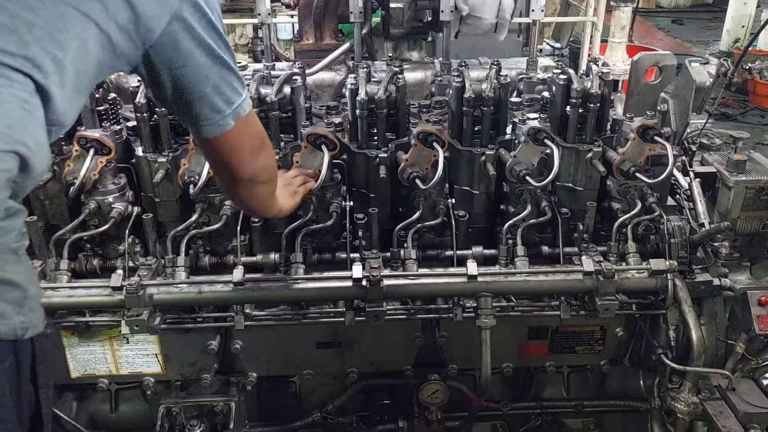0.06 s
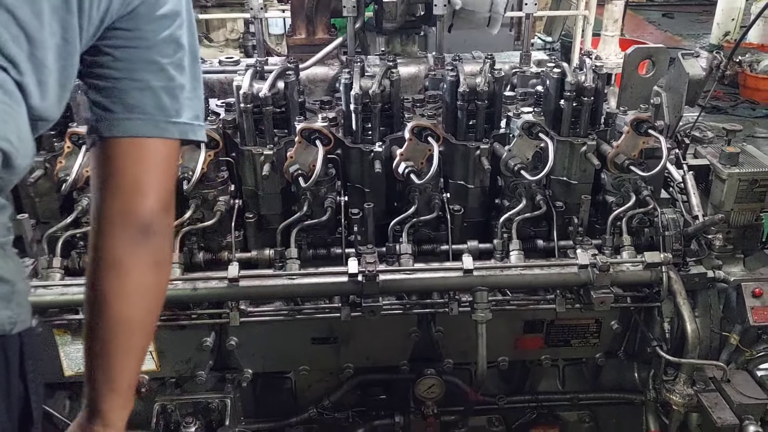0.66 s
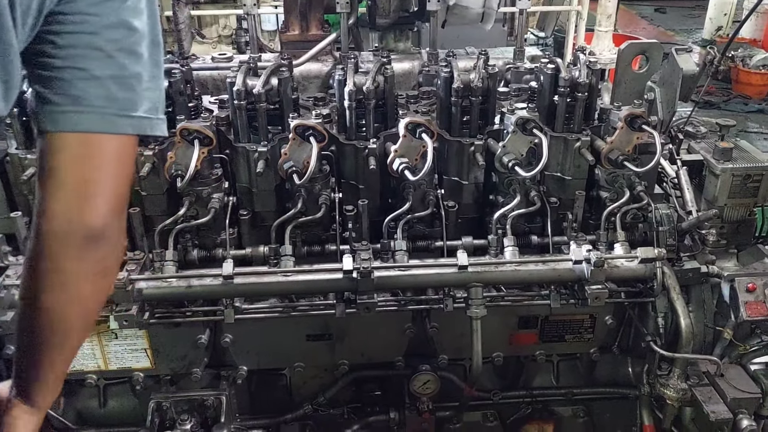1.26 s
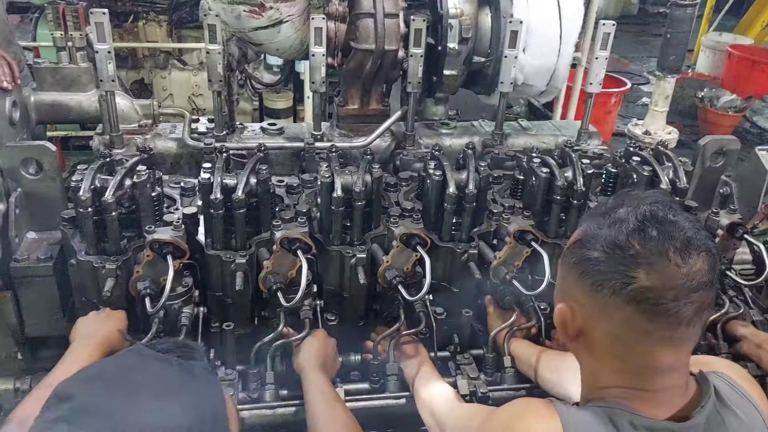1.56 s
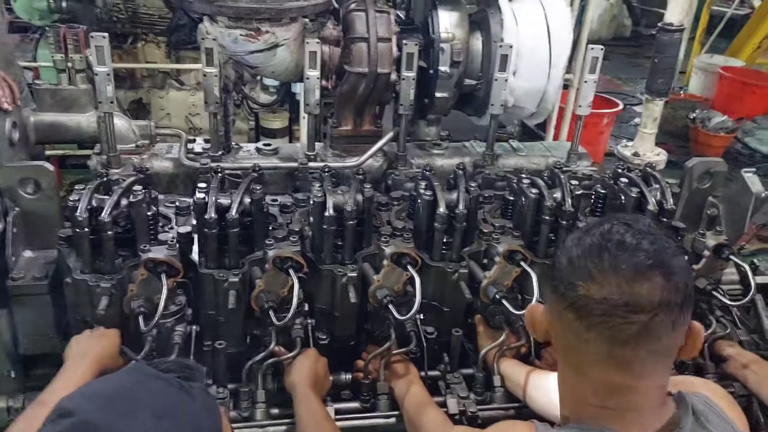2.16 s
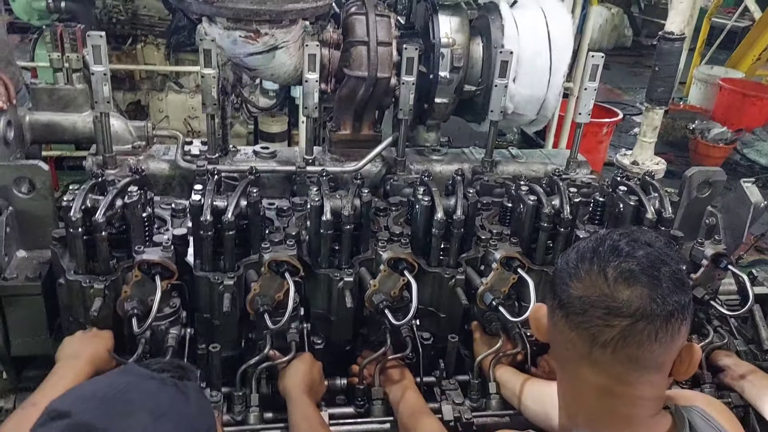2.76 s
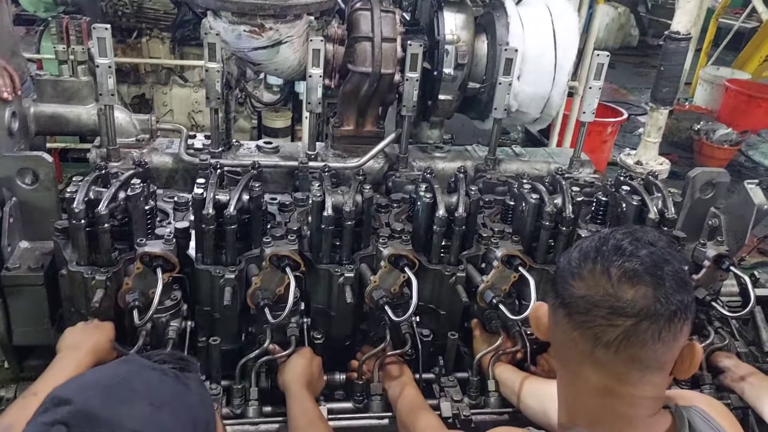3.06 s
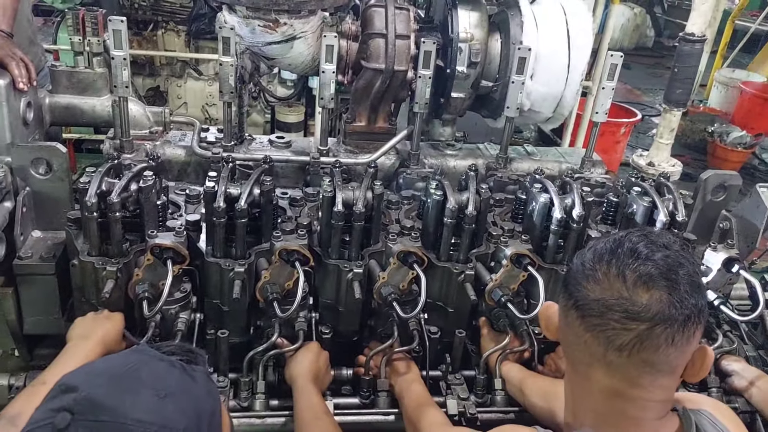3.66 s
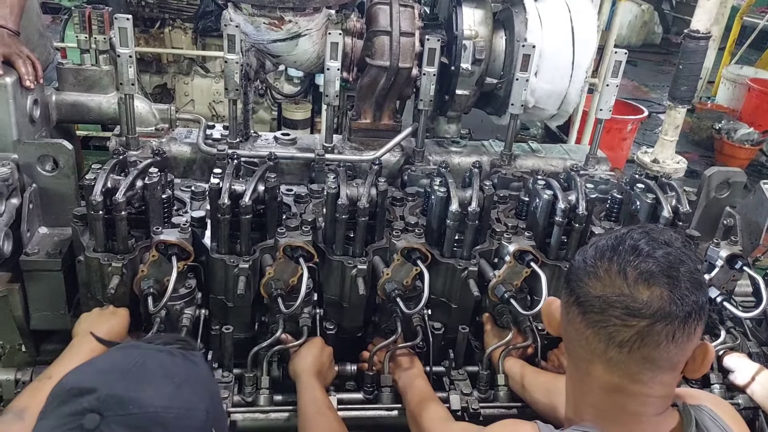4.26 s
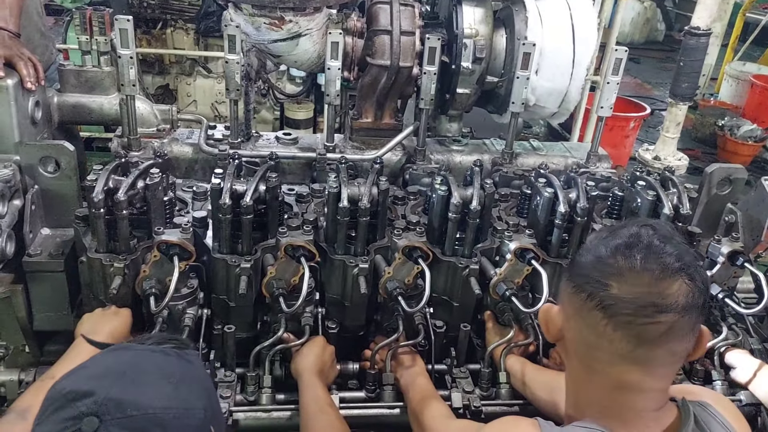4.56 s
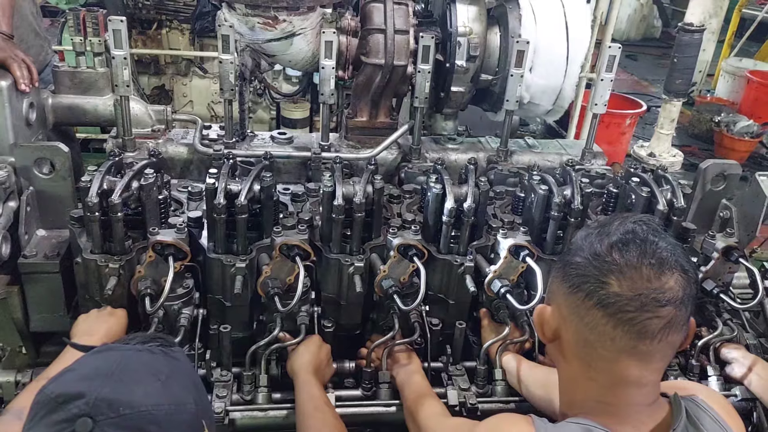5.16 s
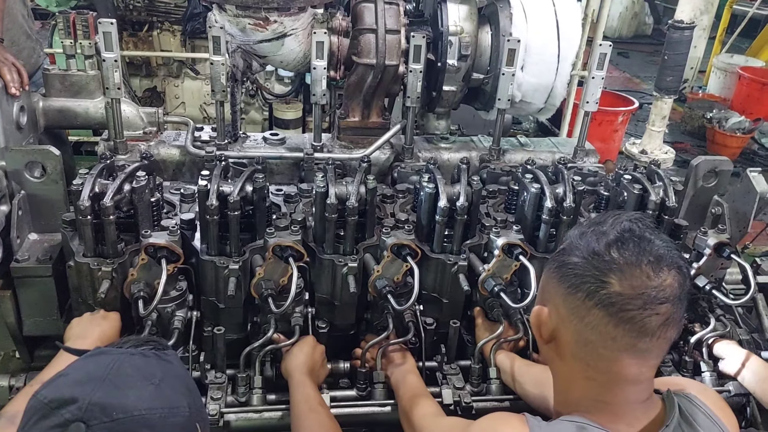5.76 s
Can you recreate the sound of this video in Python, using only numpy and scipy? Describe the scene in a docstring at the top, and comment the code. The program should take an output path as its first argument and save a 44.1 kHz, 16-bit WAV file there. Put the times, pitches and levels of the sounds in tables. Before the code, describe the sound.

In a ship's steel engine room, gears coast down with a falling whine and rattle, then cut to a brief silence. A low hum returns with a heavy, dull clunk and a few distant knocks. Compressed air suddenly bursts in with a hiss and boom, and a large diesel engine turns over nearby, quickly gathering speed into a loud, steady rhythm of thumps, valve clatter and whistling gears.

```python
"""A steel engine room with a marine diesel. Gears coast down with a falling whine; after a short
silence the room hums and something heavy clunks. Starting air bursts in and the engine turns over,
quickening to seven working cycles a second: in each one the valve gear clatters, the block thumps
and the gears whistle as the crank surges."""
import sys
import numpy as np
from scipy import signal
from scipy.fft import rfft, irfft
from scipy.io import wavfile
from scipy.ndimage import uniform_filter1d

SR = 44100
rng = np.random.default_rng(int(sys.argv[2]) if len(sys.argv) > 2 else 0)


def to_wav(s):
    """Save 16-bit WAV."""
    ch = np.atleast_2d(s).T  # columns
    pcm = np.round(np.clip(ch, -1, 1) * 32767)  # PCM
    wavfile.write(sys.argv[1], SR, pcm.astype(np.int16))


N = 261072
TIME, FREQS = np.arange(N) / SR, np.maximum(np.fft.rfftfreq(N, 1 / SR), 1)
SILENCE_FROM_S, SILENCE_TO_S = .787, .95


def from_db(db):
    """Decibels to gain."""
    return 10 ** (np.asarray(db) / 20)


def unit_power(x):
    """Scale to an RMS of 1."""
    return x / np.sqrt(np.mean(x ** 2) + 1e-20)


def eq_curve(points):
    """Join (Hz, dB) points along a log-frequency axis."""
    hz, db = np.transpose(points)
    return np.interp(np.log(FREQS), np.log(hz), db)


def drift(rate_hz):
    """A random wobble of spread 1, mostly slower than the given rate."""
    return unit_power(irfft(rfft(rng.standard_normal(N)) / (1 + (FREQS / rate_hz) ** 2), N))


def envelope(start_s, attack_s, hold_s, fall_db_per_s):
    """A straight attack, a hold and an exponential release."""
    since = TIME - start_s
    release = from_db(-fall_db_per_s * np.maximum(since - attack_s - hold_s, 0))
    return np.clip(since / attack_s, 0, 1) * release


def swell(peak_s, half_s):
    """A single bell-shaped swell of height 1."""
    return np.exp(-((TIME - peak_s) / half_s) ** 2)


def cycle_offset(phase, peak):
    """Signed distance from the nearest peak, in cycles."""
    return (phase - peak + .5) % 1 - .5


def bump(phase, peak, half):
    """A swell of height 1 that returns at the same point of every cycle."""
    return np.exp(-(cycle_offset(phase, peak) / half) ** 2)


def tone(hz, flutter, rough_db):
    """A gliding tone of unit power that wavers in pitch and strength."""
    angle = 2 * np.pi * np.cumsum(hz * (1 + flutter * drift(58.4))) / SR
    return unit_power(np.sin(angle) * from_db(rough_db * drift(54)))


def ring(clicks, hz, t60):
    """A unit click sets a decaying sine of height 1 ringing."""
    r, w = from_db(-60 / (t60 * SR)), 2 * np.pi * hz / SR
    return signal.lfilter([0, np.sin(w)], [1, -2 * r * np.cos(w), r * r], clicks + 1e-18)


def reflect(x, t60, wet_db):
    """Steel walls add a dense tail, different at each ear; the power is kept."""
    tail = rng.standard_normal((2, SR // 2)) * from_db(-60 * TIME[:SR // 2] / t60)
    tail /= np.sqrt(np.sum(tail ** 2, axis=1, keepdims=True))
    wet = from_db(wet_db) * signal.fftconvolve(x[None], tail, axes=1)[:, :N]
    return unit_power(x + wet) * np.std(x)


def standing_waves(depth_db=4, spacing_hz=24.36):
    """Reflections between steel surfaces leave narrow peaks and dips above 500 Hz: two curves in dB."""
    grid = np.arange(0, SR / 2, spacing_hz)
    ripple = np.array([np.interp(FREQS, grid, row) for row in rng.standard_normal((len(grid), 2)).T])
    return depth_db * ripple * np.clip(FREQS / 1000 - .5, 0, 1)


# Stereo width, narrow in the bass. Each row: frequency in Hz, side minus mid in dB.
STEREO_WIDTH = [(60, -14.5), (150, -20.5), (300, -10), (550, -6), (1100, 1), (15000, -.5)]

def colour(pair, spectrum):
    """Two unrelated signals become mid and side of one sound with this spectrum and steep skirts."""
    outside = np.maximum(spectrum[0][0] / FREQS, 1) * np.maximum(FREQS / spectrum[-1][0], 1)
    mid, side = rfft(pair) * from_db(eq_curve(spectrum) + standing_waves()) / outside ** 8
    mid, side = irfft(mid, N), irfft(side * from_db(eq_curve(STEREO_WIDTH)), N)
    return np.array([mid + side, mid - side]) / np.std(mid)


def noise(spectrum):
    """Steady stereo noise, shaped by (Hz, dB) points."""
    return colour(rng.standard_normal((2, N)), spectrum)


def bearing(start_hz=1405, sag_hz_per_s=520):
    """A bearing sings briefly, sagging as the gears slow."""
    singing = tone(np.maximum(start_hz - sag_hz_per_s * TIME, 100), flutter=.007, rough_db=2.5)
    return from_db(-39) * envelope(0, attack_s=.017, hold_s=.057, fall_db_per_s=91) * singing


# The gears' slowdown. Each row: time in seconds, tooth rate in Hz.
COAST_TOOTH_RATE = [(0, 1410), (.08, 1345), (.19, 1165), (.25, 1092), (.345, 960), (.43, 863), (.565, 688),
                    (.79, 472)]
# Their whine. Each row: multiple of the tooth rate, level in dB before fading.
WHINE_HARMONICS = [(1, -47.5), (2, -54), (3, -61)]
# Loaded teeth. Each row: peak and half length in seconds, multiple of the tooth rate, level in dB.
TOOTH_SQUEAKS = [(0.031, 0.014, 1, -38), (0.15, 0.021, 1, -51), (0.188, 0.025, 2, -44),
                 (0.247, 0.016, 2, -39.5), (0.297, .015, 2, -42), (0.347, .018, 2, -46),
                 (0.428, 0.011, 2, -44), (0.472, 0.014, 2, -49), (0.559, 0.025, 3, -45.5),
                 (0.569, 0.0092, 2, -42.5), (0.618, 0.011, 1, -50.5)]
# The gears' rattle. Each row: frequency in Hz, relative level in dB.
RATTLE_SPECTRUM = [(260, -34), (450, -0.5), (477, -13), (802, -4.5), (1030, -5), (1350, -2), (1520, -5),
                   (2100, -0.5), (2800, -8.5), (3530, -13.5), (5100, -11), (5750, -14.5), (7070, -13.5),
                   (8320, -28), (13000, -29.5), (15500, -50)]

def coasting_gears(fade_from_s=.49, housing_hz=1300):
    """Free-running gears whine, squeak and rattle as they slow; their housing radiates lows poorly."""
    fading_s = np.maximum(TIME - fade_from_s, 0)
    tooth_hz = np.interp(TIME, *np.transpose(COAST_TOOTH_RATE))
    angle = 2 * np.pi * np.cumsum(tooth_hz * (1 + .0075 * drift(125))) / SR
    whine = 0
    for k, db in WHINE_HARMONICS:
        level = from_db(db - 3.9 * TIME - 20 * fading_s + 3.3 * drift(50))
        radiated = np.minimum(k * tooth_hz / housing_hz, 1) ** 2
        whine += level * radiated * np.sin(k * angle)
    for peak_s, half_s, k, db in TOOTH_SQUEAKS:
        whine += from_db(db) * swell(peak_s, half_s) * np.sqrt(2) * np.sin(k * angle)
    rattle = from_db(-42.5 - 26 * fading_s + 1.1 * drift(90)) * noise(RATTLE_SPECTRUM)
    return rattle + reflect(whine + bearing(), t60=.2, wet_db=-7)


# A thin, breathy hiss. Each row: frequency in Hz, relative level in dB.
SIGH_SPECTRUM = [(2800, 1), (4200, -4), (5200, 2.5), (5900, -3), (7000, -1), (8300, -14), (13000, -13),
                 (15000, -18)]

def sigh():
    """Spent air sighs out while the gears coast."""
    return from_db(-47) * swell(peak_s=.27, half_s=.19) * noise(SIGH_SPECTRUM)


# The low and high beds of room tone. Each row: frequency in Hz, relative level in dB.
RUMBLE_SPECTRUM = [(36, -25), (62, -0.5), (113, -14.5), (178, -5.5), (220, -13.5), (244, -8.5),
                   (308, -10.5), (365, -19.5), (433, -23), (480, -33), (620, -56), (1060, -120)]
HISS_SPECTRUM = [(260, -44), (450, -10), (851, -10.5), (1080, -9.5), (1450, -7.5), (1680, -9), (2200, -3.5),
                 (2470, -9), (2650, -7), (3100, -14), (4400, -11), (5050, -4), (5700, -10.5), (7000, -13),
                 (7500, -22), (15500, -22)]
# Whistling ducts. Each row: centre in Hz, width in Hz, level in dB.
DUCT_RESONANCES = [(974, 71, -65), (2290, 90, -63), (3760, 60, -69), (5180, 220, -65)]

def room_tone():
    """A rumble and hiss die away with the coasting gears; after the silence, steady room tone
    fades in with whistling ducts."""
    fading = from_db(-43.5 - 5 * TIME) * noise(RUMBLE_SPECTRUM)
    fading += from_db(-43.5 - 32 * TIME) * noise(HISS_SPECTRUM)
    steady = from_db(-48) * noise(RUMBLE_SPECTRUM) + from_db(-55) * noise(HISS_SPECTRUM)
    for hz, width_hz, db in DUCT_RESONANCES:
        resonance = 1 / (1 + (2 * (FREQS - hz) / width_hz) ** 2)
        steady += from_db(db) * unit_power(irfft(rfft(rng.standard_normal((2, N))) * resonance, N))
    fade_in = np.clip((TIME - SILENCE_TO_S) / .11 + .13, 0, 1)
    return (TIME < SILENCE_FROM_S) * fading + fade_in * steady


# Distant knocks. Each row: start in seconds, level in dB.
PLATE_BLOWS = [(0.499, -45.5), (0.564, -42), (1.08, -59), (1.245, -39.5), (1.634, -46), (2.05, -48)]
# The plate's boom. Each row: pitch in Hz, gain in dB, seconds to fall 60 dB.
PLATE_MODES = [(174, -8, 0.97), (247.7, 1.5, 0.41), (272, -8, 0.31)]

def deck_plate():
    """Soft far blows ring a deck plate, blurred by the room."""
    clicks = np.zeros(N)
    for start_s, db in PLATE_BLOWS:
        clicks[int(start_s * SR)] = from_db(db)
    ringing = sum(ring(clicks * from_db(db), hz, t60) for hz, db, t60 in PLATE_MODES)
    return reflect(ringing, t60=.31, wet_db=-18)


# The clunk's dull body. Each row: frequency in Hz, relative level in dB.
CLUNK_SPECTRUM = [(59, -40), (100, -14), (133, -2), (203, -30), (243, -6), (310, 0), (350, -5.5),
                  (2010, -27.5), (2600, -34), (3380, -64), (5720, -120)]

def clunk(slide_s=.926, hit_s=1.061):
    """Something heavy slides, then clunks home with a short, brighter contact."""
    slide = from_db(-48.5) * envelope(slide_s, attack_s=.046, hold_s=.088, fall_db_per_s=92)
    blow = from_db(-41) * envelope(hit_s, attack_s=.0075, hold_s=.072, fall_db_per_s=77)
    contact = from_db(-41.5) * envelope(hit_s, attack_s=.001, hold_s=.02, fall_db_per_s=220)
    body = (slide + blow) * from_db(1.3 * drift(56)) * noise(CLUNK_SPECTRUM)
    return body + contact * noise([(500, 2), (1600, -15)])


def generator_hum(start_s=1.1, hz=49.7):
    """A generator's low hum fades in and stays."""
    level = np.clip((TIME - start_s) / .13, 0, 1) * from_db(-45 + .54 * drift(6))
    return level * np.sqrt(2) * np.sin(2 * np.pi * hz * TIME)


def lever(start_s=2.095):
    """The starting lever gives a faint squeak just before the air comes."""
    squeak = tone(hz=1000, flutter=.04, rough_db=3)
    return from_db(-56) * envelope(start_s, attack_s=.009, hold_s=.012, fall_db_per_s=400) * squeak


# Bright jet, roaring pipes and deep boom. Each row: frequency in Hz, relative level in dB.
JET_SPECTRUM = [(590, -48), (1000, -15), (1170, -17), (1370, -1), (1600, -9.5), (1870, 7), (2080, 4),
                (2500, -12.5), (3910, -10.5), (5230, -2.5), (5700, -5.5), (6220, -4.5), (6950, -5),
                (8440, -17.5), (12600, -8.5), (15500, -23)]
ROAR_SPECTRUM = [(120, -40), (200, -2.5), (301, -5), (342, -10.5), (591, -8), (720, -3), (879, -8),
                 (1040, -24), (1350, -14.5), (1600, -22), (1900, -13.5), (2600, -19), (3380, -24.5),
                 (5720, -120)]
BOOM_SPECTRUM = [(29, -41), (50, -30), (70, -1), (100, -7), (132, 1.5), (165, -6.5), (215, -2), (284, -11),
                 (332, -4), (450, -11.5), (580, -37), (990, -120)]
# Filling cylinders. Each row: start, attack and hold in seconds, fall in dB per second, level in dB.
CYLINDER_BOOMS = [(2.192, 0.018, 0.12, 118, -26), (2.23, .018, 0.031, 300, -16),
                  (2.332, 0.011, 0.065, 113, -24), (2.555, .015, .03, 150, -29.5)]

def starting_air(opens_s=2.161, shuts_s=2.7):
    """The valve cracks open, pipes roar and cylinders boom; air flows on weakly until it shuts."""
    flow = envelope(opens_s, attack_s=.013, hold_s=shuts_s - opens_s - .06, fall_db_per_s=159)
    crack = from_db(-21.5) * envelope(opens_s, attack_s=.00063, hold_s=.0026, fall_db_per_s=750)
    burst = from_db(-25.5) * envelope(opens_s, attack_s=.0012, hold_s=.07, fall_db_per_s=260)
    puff = from_db(-47) * envelope(2.42, attack_s=.12, hold_s=.01, fall_db_per_s=170)
    rush = from_db(-14.5) * envelope(2.165, attack_s=.059, hold_s=.0056, fall_db_per_s=192)
    filling = sum(from_db(db) * envelope(*shape) for *shape, db in CYLINDER_BOOMS)
    jet = (crack + burst + puff + from_db(-44) * flow) * from_db(.96 * drift(120)) * noise(JET_SPECTRUM)
    roar = (rush + from_db(-33) * flow) * from_db(.94 * drift(70)) * noise(ROAR_SPECTRUM)
    return jet + roar + filling * noise(BOOM_SPECTRUM)


def crank(start_s, first_speed=.321, run_up_s=.41, full_cycles_per_s=7.16):
    """The run-up: share of full speed, cycles done, and the present cycle's age in samples."""
    speed = 1 - (1 - first_speed) * np.exp(-np.maximum(TIME - start_s, 0) / run_up_s)
    cycles = np.cumsum(speed * (TIME > start_s)) * full_cycles_per_s / SR
    began = np.searchsorted(cycles, np.floor(cycles), side="right")
    return speed, cycles, np.maximum(np.arange(N) - began, 0)


def contacts(age, spectrum, alike, grain_db):
    """Dense contacts of uneven size: the share `alike` falls the same way in every cycle."""
    same, fresh = (rng.standard_normal((2, N)) * from_db(grain_db * drift(226)) for _ in range(2))
    return colour(np.sqrt(alike) * same[:, age] + np.sqrt(1 - alike) * fresh, spectrum)


# The weight of the block. Each row: frequency in Hz, relative level in dB.
THUMP_SPECTRUM = [(21, -46), (35, -36), (70, 2.5), (102, -5), (135, 3.5), (163, -5), (215, -4), (276, -7.5),
                  (318, -2), (354, -5.5), (380, -10.5), (490, -6.5), (840, -120)]

def block_thump(cycles, age, slow):
    """The block thumps early in each cycle and dips near its end, more deeply at low speed."""
    push_db = 1.8 * bump(cycles, peak=.21, half=.61)
    dip_db = (1.5 + 26 * slow * (cycles > .6)) * bump(cycles, peak=.89, half=.13)
    level = from_db(-25.5 - 14 * slow + push_db - dip_db)
    return level * contacts(age, THUMP_SPECTRUM, alike=.42, grain_db=1)


# Bass notes of one cycle. Each row: peak and half length in cycles, pitch in Hz,
# glide in octaves per cycle, relative level in dB.
PRESSURE_THROBS = [(.005, .08, 78, 1, -0.5), (.08, .06, 134.5, 2, -1), (.145, 0.05, 214.1, 0, 2),
                   (.24, .085, 135.1, -1, -1), (.4, .07, 105, -2, -3.5), (.84, .06, 77.9, 0, -1.5)]

def block_throbs(phase, slow):
    """Pressure swings in the block: a deep push, a swoop upward as the cylinder fires, and a sag."""
    out = 0
    for peak, half, hz, glide, db in PRESSURE_THROBS:
        note = tone(hz * 2 ** (glide * cycle_offset(phase, peak)), flutter=.04095, rough_db=0)
        out += from_db(db) * bump(phase, peak, half) * note
    return from_db(-23.5 - 26 * slow + 1.1 * drift(5.4)) * out


# The valve gear's clatter. Each row: frequency in Hz, relative level in dB.
CLATTER_SPECTRUM = [(270, -21), (460, -4.5), (591, -2.5), (705, -2), (1030, -12.5), (1430, -11.5),
                    (1760, -8), (1920, -13), (2160, -7.5), (3030, -18.5), (4180, -23.5), (6800, -26.5),
                    (7990, -33), (14000, -34), (15500, -44)]

def valve_clatter(age, drive_db):
    """The valve gear's many small contacts blur into a clatter."""
    return from_db(-26 + drive_db) * contacts(age, CLATTER_SPECTRUM, alike=.41, grain_db=1)


# Six cams load the gears. Each row: peak and half length in cycles, relative level in dB.
CAM_LOADS = [(.155, .038, -1), (0.258, .042, 3), (.42, 0.056, 4.5), (.56, 0.025, -11), (.7, .075, 3.5),
             (.875, .048, -1)]

def timing_gears(phase, age, slow, tooth_hz, lull_db):
    """The same teeth meet in every cycle, churning and growling as the cams load them."""
    wander_db = drift(6.5)
    churn = contacts(age, [(310, .18), (430, -2.2)], alike=.62, grain_db=4)
    churn *= from_db(-30 - 36.5 * slow + wander_db + lull_db)
    drag = from_db(-8.5) * np.sin(np.pi * phase)
    load = drag + sum(from_db(db) * bump(phase, peak, half) for peak, half, db in CAM_LOADS)
    surge = 1 + .17 * bump(phase, peak=.1665, half=.1004)   # each firing speeds the crank briefly
    teeth = np.cumsum(tooth_hz * surge) / SR
    teeth_this_cycle = teeth - teeth[np.arange(N) - age]
    mesh = np.sin(2 * np.pi * teeth_this_cycle + .4 * drift(25)) * from_db(1.46 * drift(23))
    growl = from_db(-24.5 - 46.5 * slow + wander_db) * load * unit_power(mesh)
    return churn + reflect(growl, t60=.25, wet_db=-10)


# Squealing parts. Each row: peak and half length in cycles, multiple of the tooth rate,
# glide in octaves per cycle, flutter as a share of the pitch, relative level in dB.
CAM_SQUEALS = [(.075, .04, 4.33, -.2, .007, 0.5), (.16, .055, 4.28, -.15, .01, 1),
               (.17, .05, 5.33, .1, 0.0117, -5.5), (.31, 0.048, 4.17, -0.54, 0.0262, -1),
               (.32, 0.046, 5.93, -.2, .018, -8), (.42, .08, 3.8, -.5, .028, -5.5),
               (.6, .05, 4.0, .3, 0.0199, -8.5), (.82, .07, 4.2, 0, 0.0202, -17)]

def squeals(phase, slow, tooth_hz, effort_db):
    """Each driven part rasps briefly under its cam, gliding as the crank surges or sags."""
    out = 0
    for peak, half, multiple, glide, flutter, db in CAM_SQUEALS:
        hz = multiple * tooth_hz * 2 ** (glide * cycle_offset(phase, peak)) * (1 + .006 * drift(8))
        rasp = tone(hz, flutter, rough_db=1.8) * from_db(1.2 * drift(8))
        out += from_db(db) * bump(phase, peak, half) * rasp
    return reflect(from_db(-26 - 15 * slow + effort_db) * out, t60=.06, wet_db=-1)


# The gear cover's resonances. Each row: frequency in Hz, gain in dB.
COVER_RESPONSE = [(2800, -18), (3450, -7), (3630, -2), (3750, -4.5), (3860, -1), (3980, -4), (4120, 1.5),
                  (4280, -7), (4420, -1.5), (4650, -12), (6000, -25)]

def gear_whistle(phase, slow, tooth_hz, multiple=9.75, swing=.1):
    """A fast gear whistles through its cover, climbing and falling with every surge of the crank."""
    hz = multiple * tooth_hz * (1 + swing * np.cos(2 * np.pi * (phase - .07)))
    level_db = -41 - 4 * bump(phase, peak=.49, half=.12) + 3 * bump(phase, peak=.87, half=.075)
    rasp = from_db(level_db) * tone(hz * (1 + .029 * drift(600)), flutter=.005, rough_db=1.8)
    sung = irfft(rfft(rasp) * from_db(eq_curve(COVER_RESPONSE)), N)
    return from_db(-26 * slow) * reflect(sung, t60=.05, wet_db=-4)


# Escaping gas. Each row: frequency in Hz, relative level in dB.
CHUFF_SPECTRUM = [(1500, -1), (1850, 9.5), (2250, 5.5), (2700, -1.5), (3350, 3), (3900, -1.5), (4900, 0),
                  (5450, -5.5), (5900, -36), (6650, 2), (7100, 1.5), (7500, -17.5), (14000, -13)]

def chuffs(age, slow, delay_s=.0004, attack_s=.0057, fall_db_per_s=118):
    """Each firing lets out a sharp, spluttering puff of gas at the start of the cycle."""
    since = age / SR - delay_s
    splutter_db = 1.9 * drift(8) + 3 * drift(250)
    level = from_db(-35 - 22 * slow - fall_db_per_s * since + splutter_db)
    return np.clip(since / attack_s, 0, 1) * level * noise(CHUFF_SPECTRUM)


# The first strokes on air. Each row: peak and half length in seconds, pitch in Hz,
# then levels in dB of the fundamental, its octave and its double octave.
AIR_GROANS = [(2.404, 0.041, 320, -39, -26, -46), (2.538, 0.071, 332.4, -25.5, -26, -39),
              (2.745, 0.029, 360, -25, -27, -40), (2.9, 0.05, 362.2, -24.5, -26.5, -51),
              (3.065, 0.034, 364.7, -22.5, -26.5, -37)]

def groans(sag_octaves_per_s=.9):
    """Air forced through the cylinders groans hoarsely, sagging in pitch."""
    out = 0
    for peak_s, half_s, hz, *levels_db in AIR_GROANS:
        sag = 2 ** (-sag_octaves_per_s * np.clip(TIME - peak_s, -.5, .5))
        angle = 2 * np.pi * np.cumsum(hz * sag * (1 + .045 * drift(120))) / SR
        voice = sum(from_db(db) * np.sin(2 ** octave * angle) for octave, db in enumerate(levels_db))
        hoarseness = unit_power(from_db(3.5 * drift(70)))
        out += swell(peak_s, half_s) * np.sqrt(2) * voice * hoarseness
    return reflect(out, t60=.25, wet_db=-5.5)


# The valve rhythm. Each row: position as a share of the cycle, accent in dB.
VALVE_STRIKES = [(0.051, -2), (.13, 0), (.3, 4), (.38, 4), (.5, -1), (0.619, -14), (.74, -0.5)]
# The cylinder heads' ring. Each row: pitch in Hz, level in dB, seconds to fall 60 dB.
CYLINDER_HEAD_MODES = [(688, -32.5, 0.058), (784.4, -36, 0.11), (1121, -39.5, 0.22), (1356, -39.5, 0.12),
                       (1488, -46, 0.073), (1603, -40.5, 0.1), (1763, -36.5, 0.064), (1960, -44, .05),
                       (2390, -42, 0.13), (2716, -40.5, 0.13), (3170, -49.5, 0.12), (6230, -44, 0.025)]

def valve_knocks(cycles, effort_db, scatter_db=4):
    """From the second cycle on, rockers and valves strike the heads at the same crank angles."""
    position, accent_db = np.transpose(VALVE_STRIKES)
    cycle_starts = np.arange(1, cycles[-1])
    hits = np.searchsorted(cycles, (cycle_starts[:, None] + position).ravel())
    accent_db = np.tile(accent_db, len(cycle_starts))[hits < N]
    hits = hits[hits < N]
    out = 0
    for hz, db, t60 in CYLINDER_HEAD_MODES:
        uneven_db = scatter_db * rng.standard_normal(len(hits))
        clicks = np.zeros(N)
        clicks[hits] = from_db(db + accent_db + effort_db[hits] + uneven_db)
        out += ring(clicks, hz, t60)
    return reflect(out, t60=.29, wet_db=-1)


def engine(start_s=2.2, full_tooth_hz=409.7):
    """The crank drives block, valves and gears, all growing louder as it gathers speed."""
    speed, cycles, age = crank(start_s)
    phase, slow = cycles % 1, 1 - speed
    tooth_hz = full_tooth_hz * speed ** .65
    # At low speed the clatter is weaker and its weight falls late in the cycle.
    late_db = 14 * (cycles > .5) * (.3 - bump(phase, peak=.17, half=.18))
    effort_db = slow * (late_db - 12.5)
    lull_db = np.interp(phase, [0, .11, .55, .77], [-5, 0, 0, -5])   # eases off between cycles
    parts = (block_thump(cycles, age, slow) + block_throbs(phase, slow)
             + valve_clatter(age, effort_db + lull_db)
             + timing_gears(phase, age, slow, tooth_hz, lull_db)
             + squeals(phase, slow, tooth_hz, effort_db) + valve_knocks(cycles, effort_db)
             + gear_whistle(phase, slow, tooth_hz) + chuffs(age, slow) + groans())
    return np.clip((TIME - start_s) / .028, 0, 1) * parts


# Panning of the engine and its air. Each row: frequency in Hz, left minus right in dB.
ENGINE_PAN = [(70, -1), (200, -1), (420, 0), (700, -0.5), (1400, -3.5), (2800, -3.5), (5500, -8),
              (9000, -0.5), (14000, -3.5)]

def scene():
    """The machinery leans to the right; everything falls silent for a moment after the coast-down."""
    pan = from_db(eq_curve(ENGINE_PAN) * [[.5], [-.5]])
    machinery = irfft(rfft(engine() + starting_air()) * pan, N)
    coast_down = (TIME < SILENCE_TO_S) * (coasting_gears() + sigh())
    room = coast_down + room_tone() + deck_plate() + clunk() + generator_hum() + lever()
    sounding = (TIME < SILENCE_FROM_S) | (TIME > SILENCE_TO_S)
    gate = uniform_filter1d(sounding.astype(float), SR // 200)   # 5 ms fades
    return gate * (machinery + room * from_db([[-1.1], [1.1]]))


def record(dry):
    """The deepest bass is lost, peaks are rounded, the top is cut."""
    low_cut = signal.butter(2, 28, "high", fs=SR, output="sos")
    high_cut = signal.ellip(10, .1, 90, 15500, fs=SR, output="sos")
    rounded = 1.472 * np.tanh(signal.sosfilt(low_cut, dry) / 1.516)
    return signal.sosfilt(high_cut, rounded)


dry = scene()
out = record(dry)
to_wav(out)
```